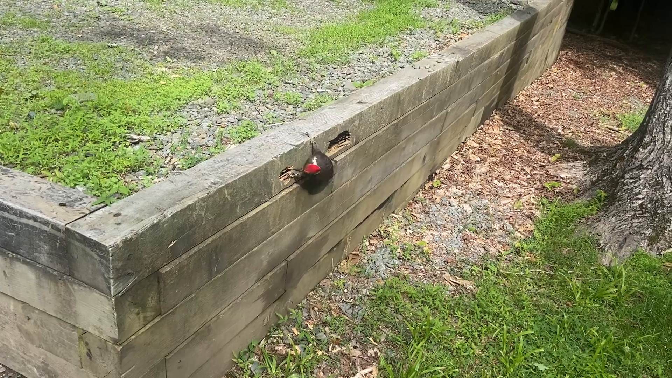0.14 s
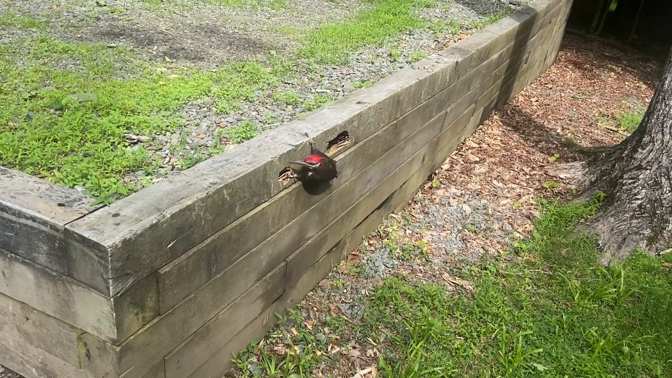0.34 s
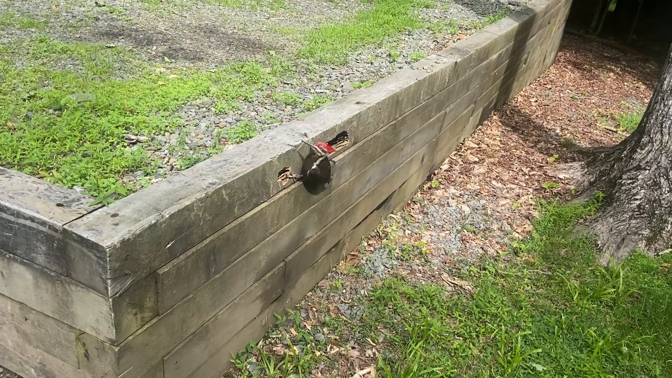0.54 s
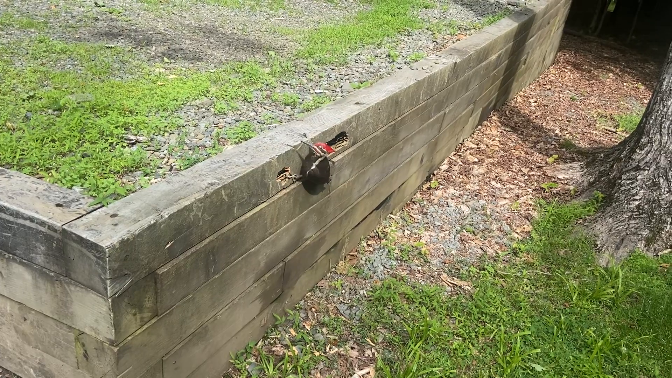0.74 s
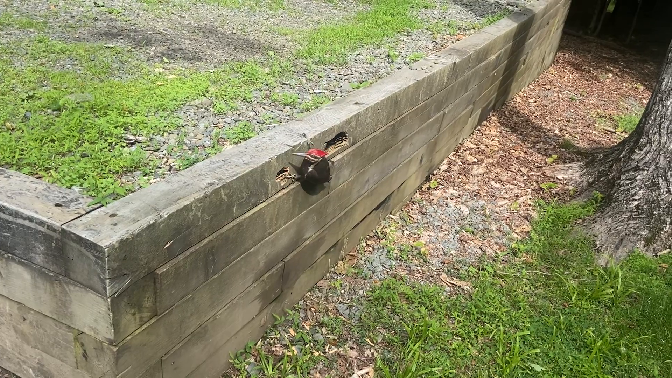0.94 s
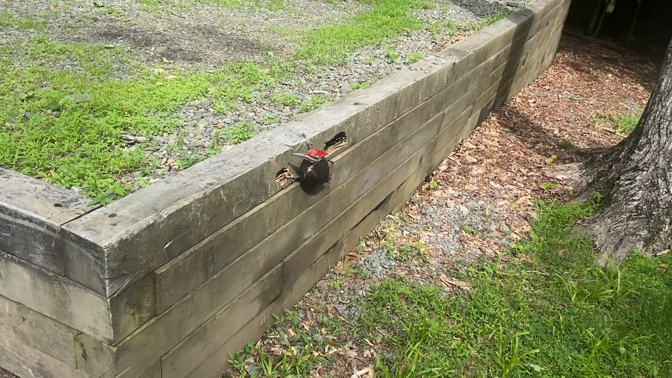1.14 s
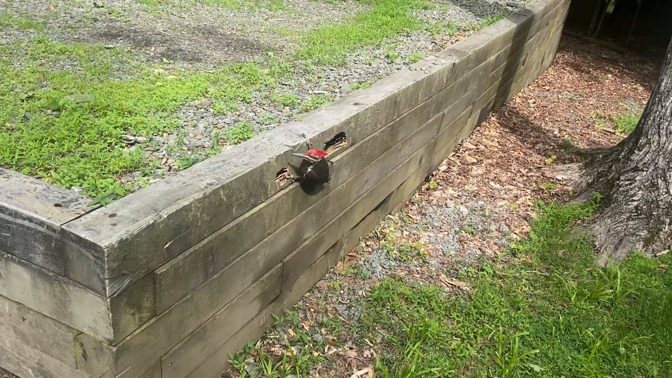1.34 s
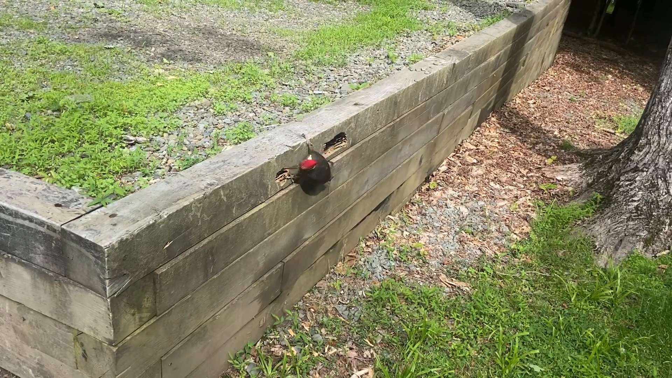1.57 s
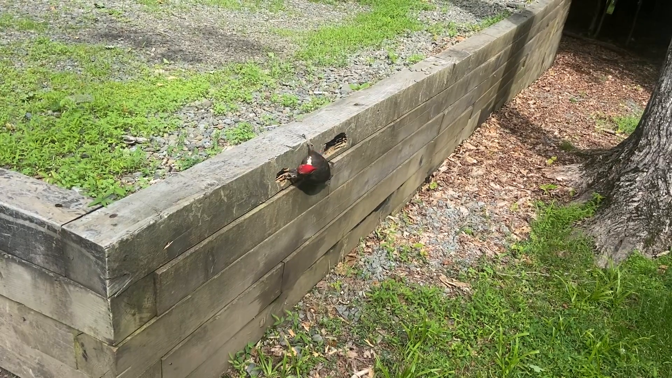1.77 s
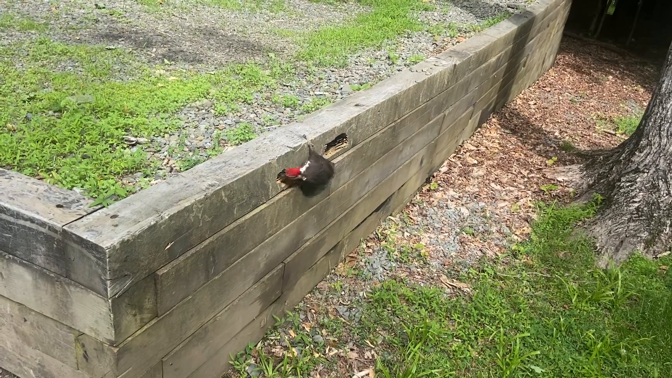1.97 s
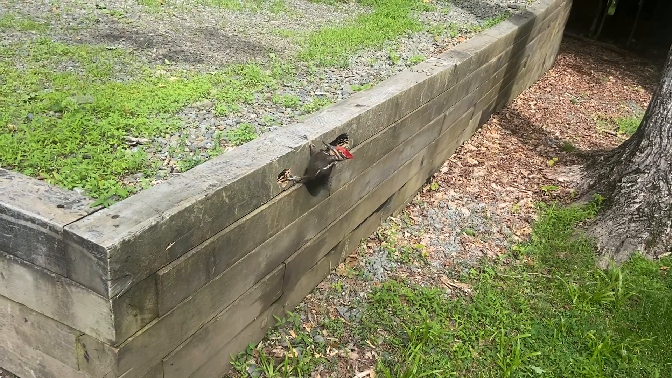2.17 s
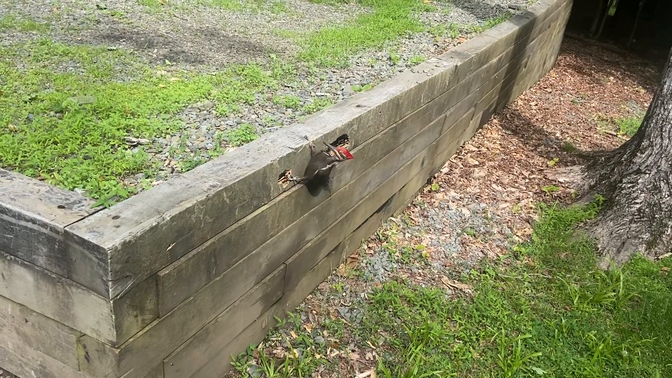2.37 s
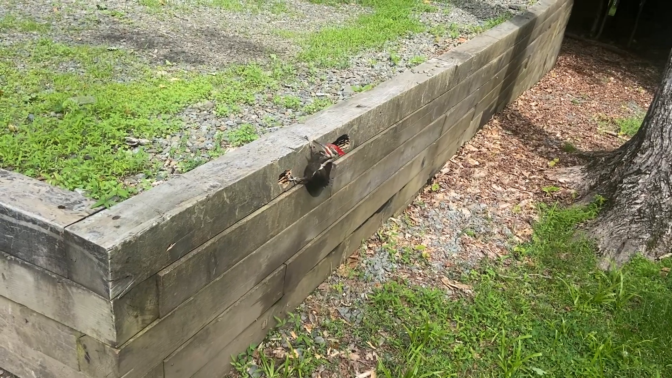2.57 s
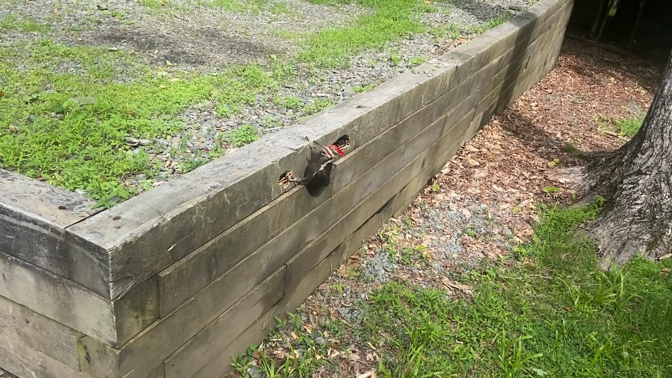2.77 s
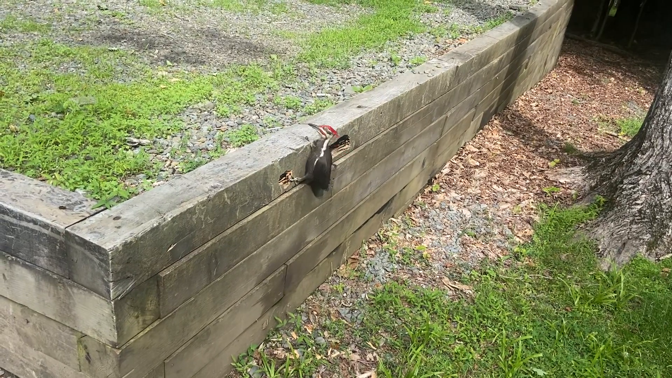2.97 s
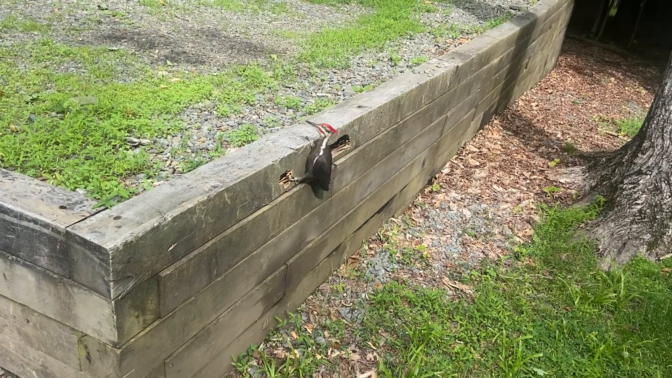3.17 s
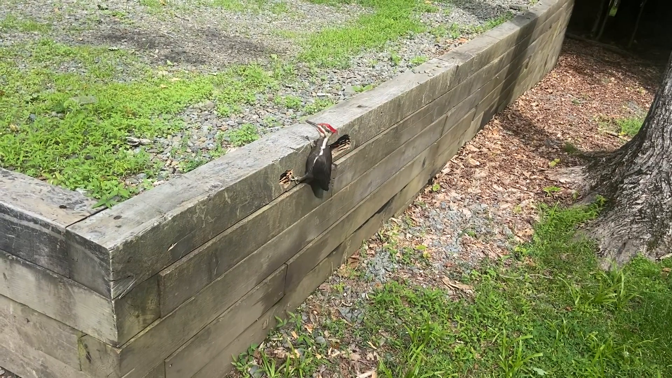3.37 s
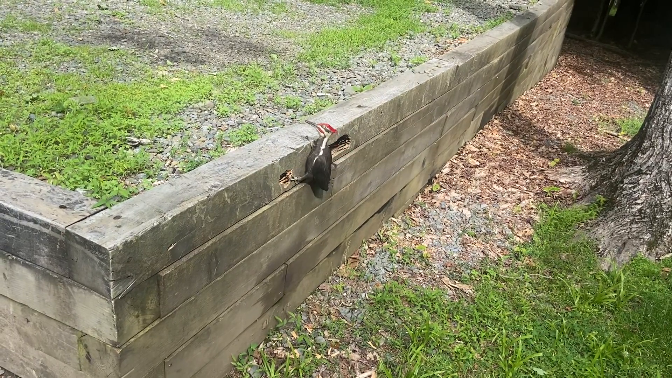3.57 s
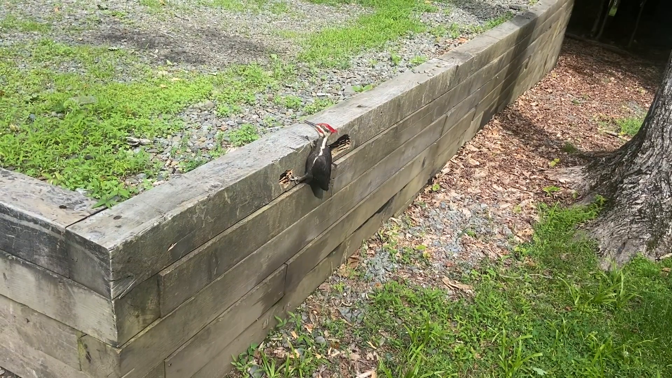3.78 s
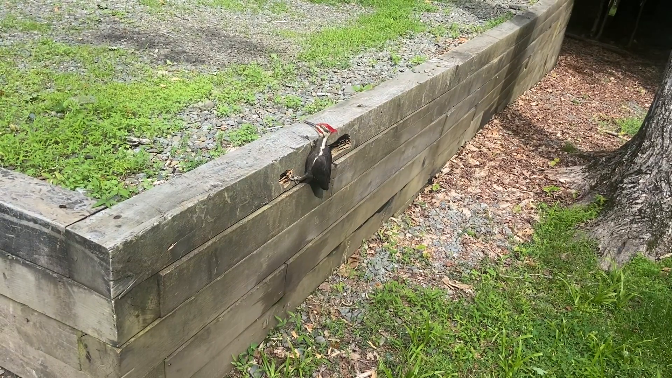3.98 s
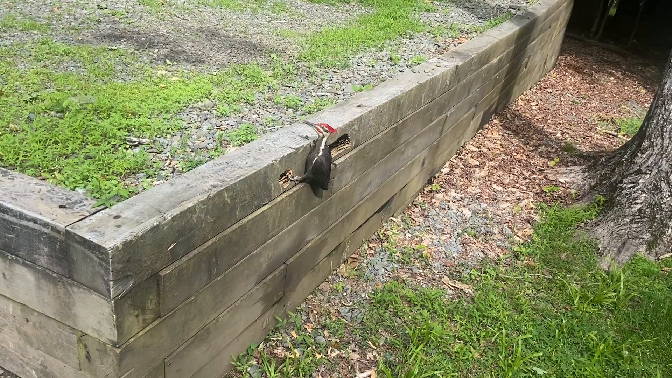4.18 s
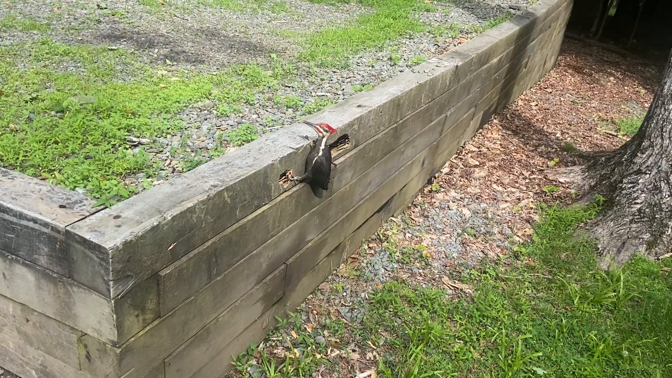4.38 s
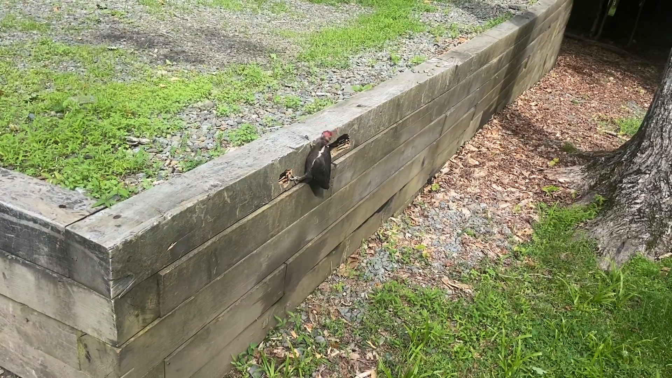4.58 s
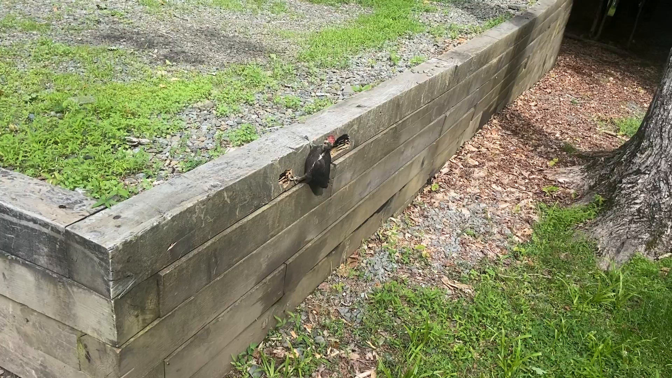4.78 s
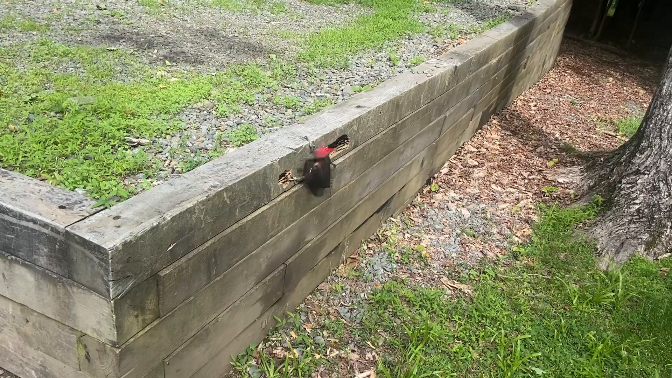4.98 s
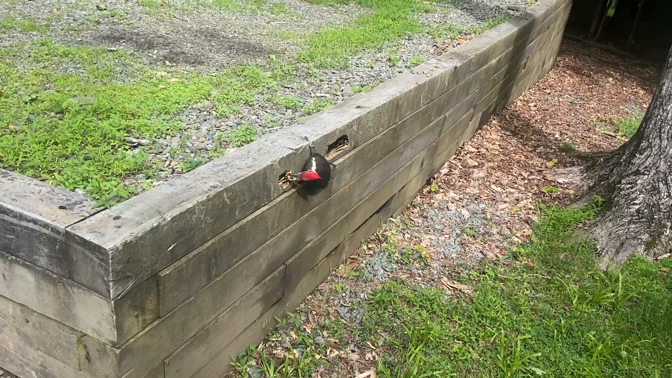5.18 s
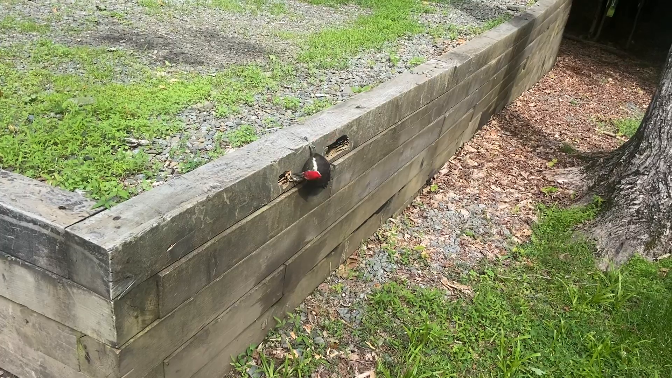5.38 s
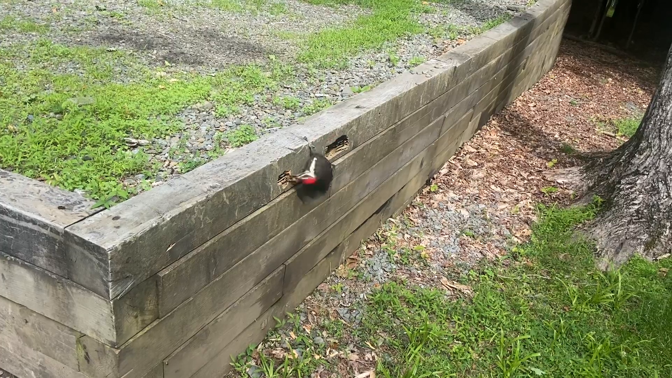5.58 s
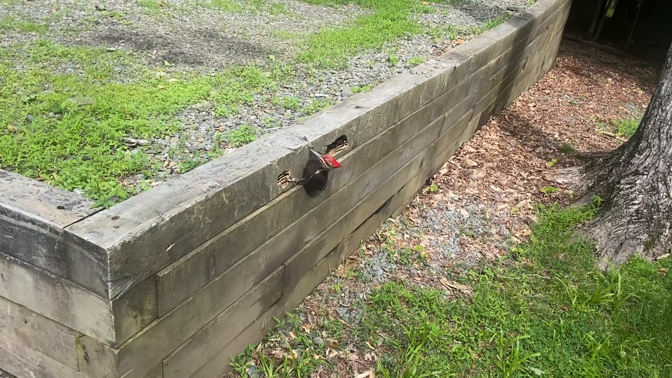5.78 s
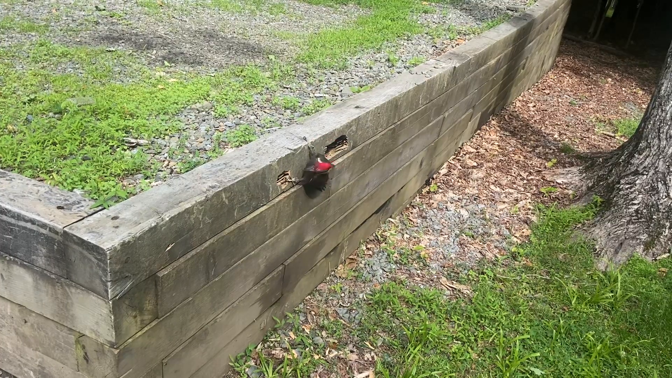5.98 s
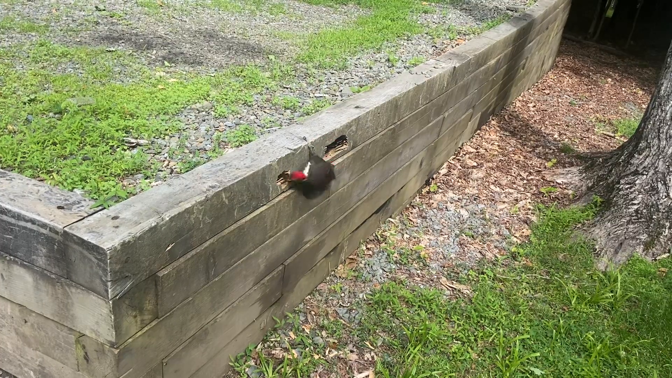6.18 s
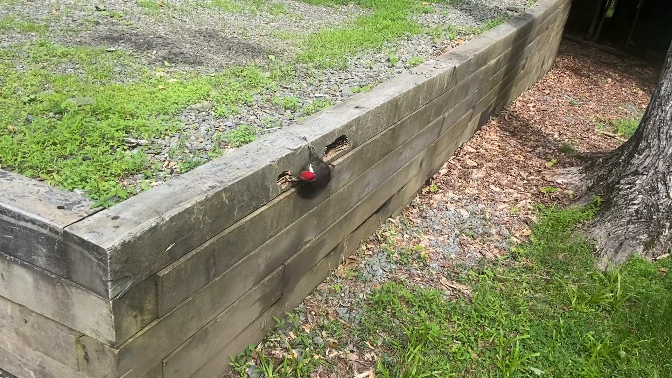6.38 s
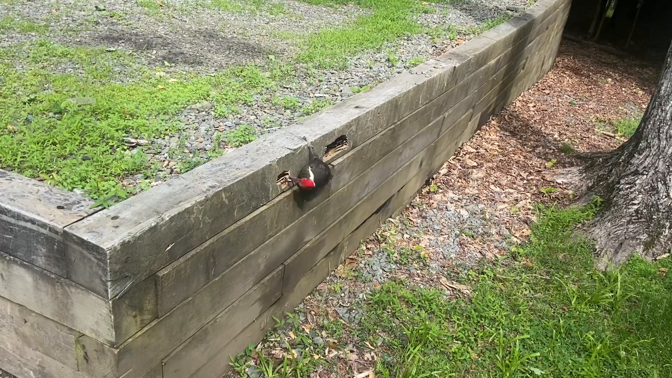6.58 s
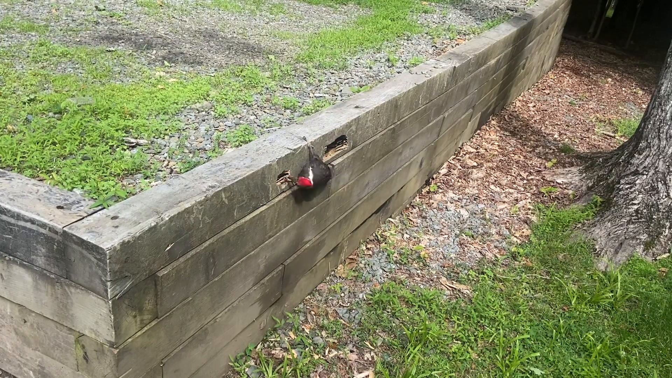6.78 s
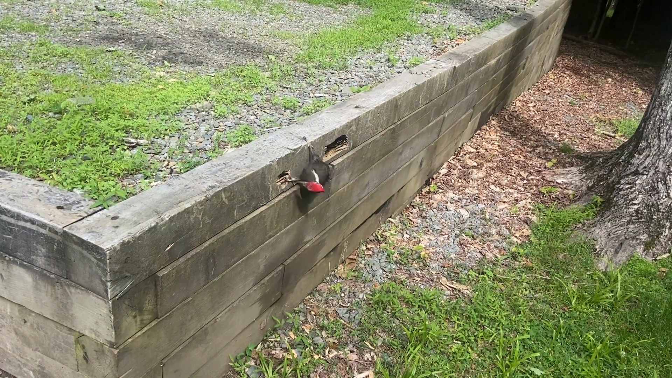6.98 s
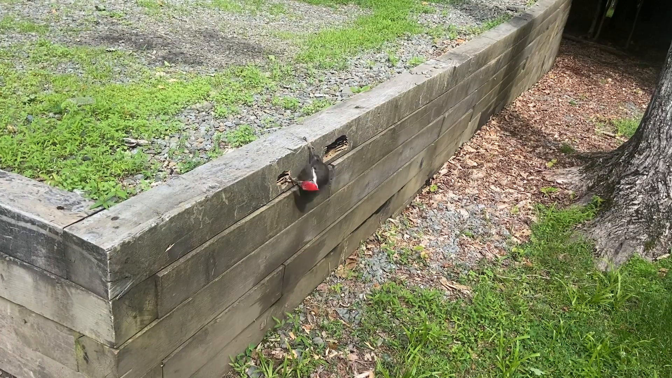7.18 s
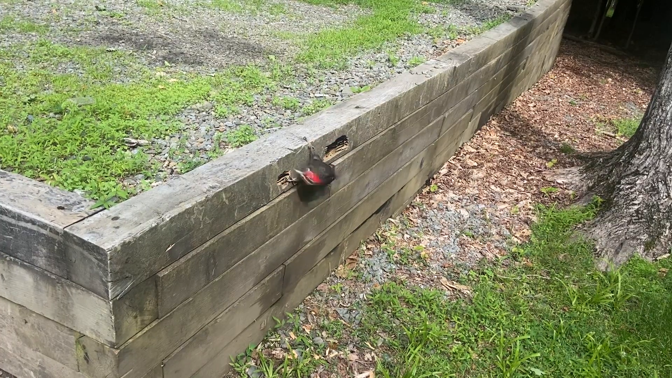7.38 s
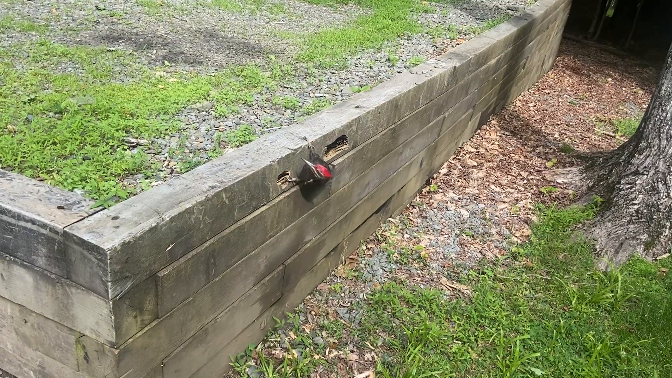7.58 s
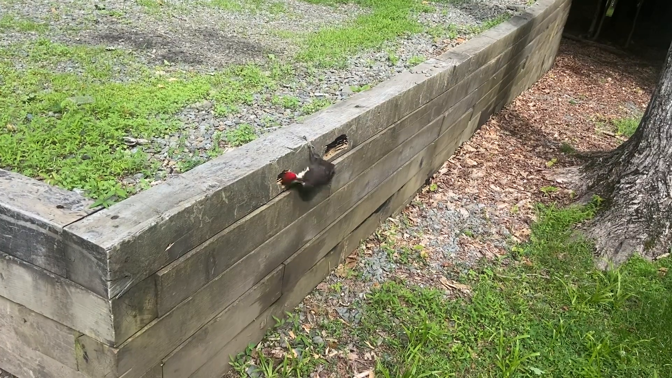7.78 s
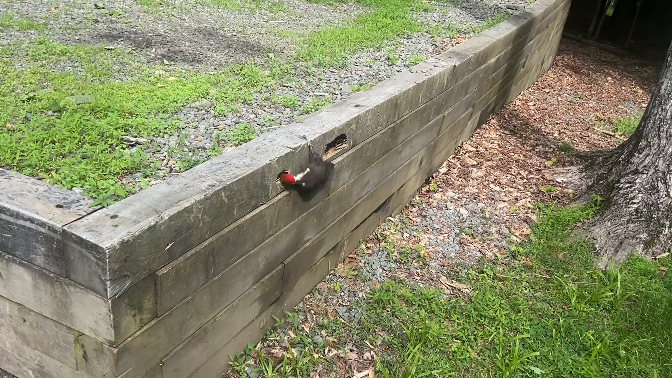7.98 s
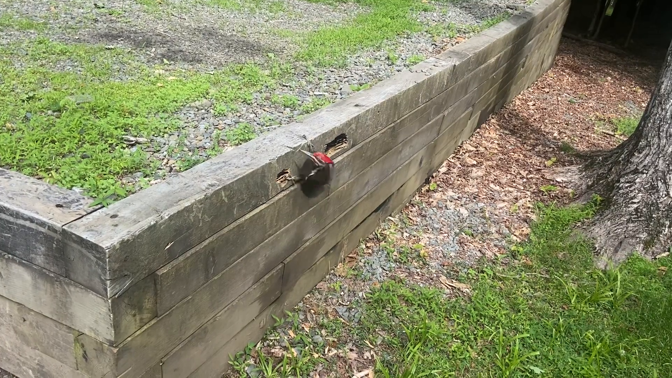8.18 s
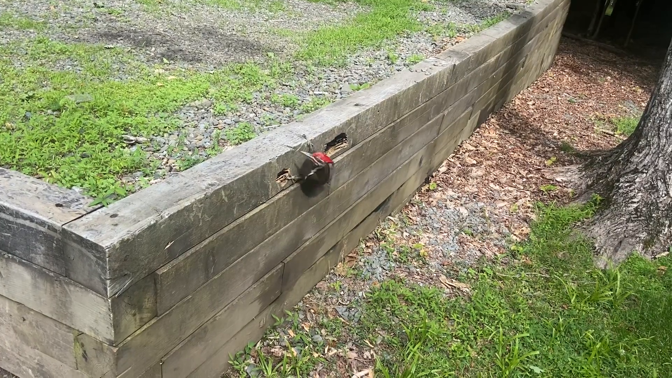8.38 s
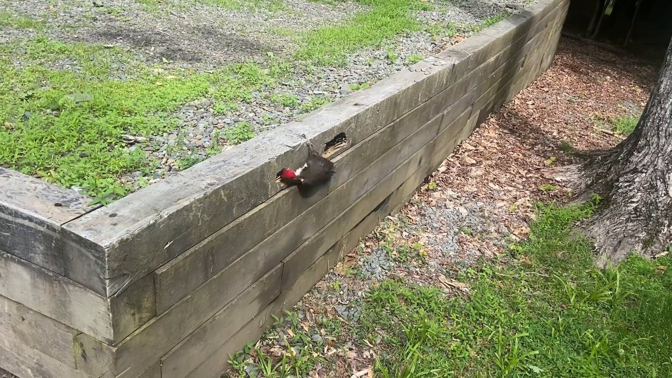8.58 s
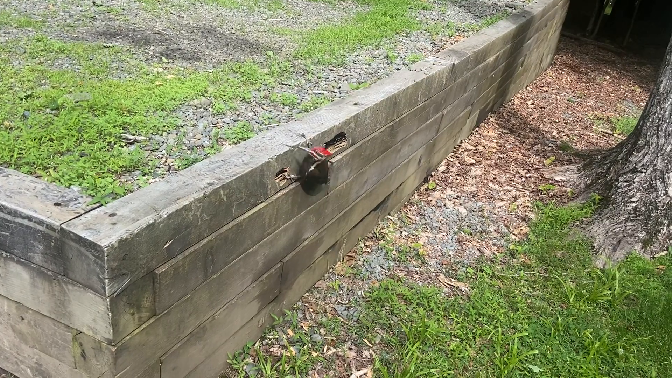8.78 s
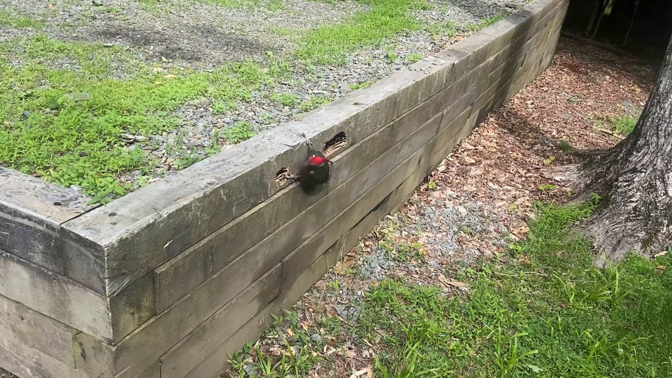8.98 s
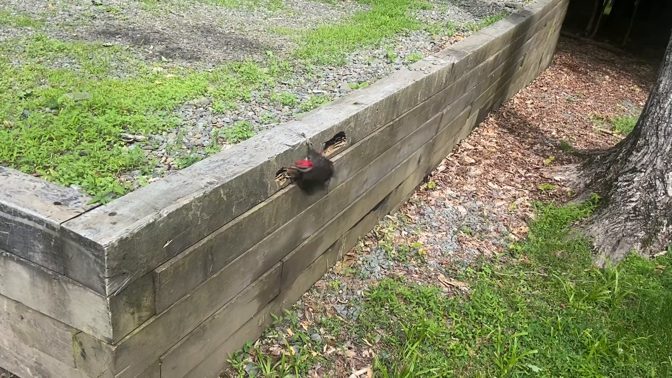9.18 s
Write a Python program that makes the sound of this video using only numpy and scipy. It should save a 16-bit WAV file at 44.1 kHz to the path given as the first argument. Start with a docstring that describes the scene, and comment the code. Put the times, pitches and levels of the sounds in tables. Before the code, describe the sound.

Outdoors by a wood, small birds sing quick, high, gliding chirps every couple of seconds over a low, faint rumble of traffic. A few metres from the microphone, a woodpecker gives a couple of sharp knocks on timber, then a quick cluster. After a gap of several seconds it returns to steadier but uneven pecking, with crisp cracks of splintering wood.

```python
"""A woodpecker chisels a stacked timber wall a few metres away, at the edge of a wood.
Each blow is an impact: fibres fracture for some milliseconds, exciting the damped modes of the beams
and radiating splinter noise. Far-off songbirds whistle gliding tones that the trees scatter into
reverberation. Beneath lie the rumble of distant traffic and a faint hiss, heard in stereo."""
import sys
import numpy as np
from scipy import signal
from scipy.fft import rfft, irfft, next_fast_len
from scipy.io import wavfile
from scipy.ndimage import map_coordinates

SR = 44100
rng = np.random.default_rng(int(sys.argv[2]) if len(sys.argv) > 2 else 0)


def generate_wav(signal):
    """Clip the signal to [-1, 1] and save it as 16-bit WAV at the path in sys.argv[1]."""
    frames = np.transpose(np.atleast_2d(signal))
    scaled = np.clip(frames, -1, 1) * 32767
    pcm = np.round(scaled).astype(np.int16)
    wavfile.write(sys.argv[1], SR, pcm)


N = 407484

# blows of the bill: t/s, strength/dB, heft/dB (thud), breadth/dB (knock and click), edge/dB (splinter),
# tip/dB (tick), entry/ms (soft push before the bite), crunch length/ms
BILL_BLOWS = [(0.2471, -7.5, -6.5, -2, -3, -18.5, 4, 0.84), (0.331, -44.5, 17.5, 0.5, 6.5, -10, 0.72, 3),
              (1.987, -31, 5.5, 3.5, -8, -13, 1.1, 11), (2.0214, -20, -14, 8, 4.5, -18, 3.7, 1.4),
              (2.038, -19.5, 1, -1, -3, -21.5, 0.9, 22), (2.062, -8.5, -6.5, -4.5, 0.5, 4.5, 5.5, 7),
              (5.516, -23, 2.5, 5, -9.5, -26, 0.91, 2.6), (5.542, -30.5, 1.5, -1, -0.5, -15, 1.5, 5.6),
              (5.583, -14, -2, -5.5, 3, 1, 6, 2.8), (6.117, -18.5, -2, 1.5, -6, -33, 1.2, 4.5),
              (6.183, -39, -9, 3, -4, -34, 0.65, 2.4), (6.415, -15, -12, 5, -7.5, -31, 2.1, 2.1),
              (6.426, -18.5, -8.5, 6, -7, -27, 0.6, 2.2), (6.629, -9, -8, 4, 0.5, -8, 5.6, 3.7),
              (6.855, -18, 5.5, 1.5, 3, -27.5, 6.9, 4.2), (7.044, -13.5, 0.5, 1, 3, -37, 2.06, 5.7),
              (7.071, -24.5, -8, -8.5, -14, -25.5, 0.79, 3.8), (7.274, -6.5, -1, -6.5, -2, -11, 4.5, 3.9),
              (7.759, -19, 4.5, 2, -3.5, -35, 9.4, 7.5), (7.974, -16, 2.5, 3.5, 5, -17, 8.6, 4),
              (8.5625, -22, -5, 5.5, 1, -38, 3.04, 2.2), (8.599, -35, -10.5, -4, -1.5, -22, 0.6, 3.6),
              (8.645, -46.5, 19, 3.5, 6, -22, 0.61, 4.3), (9.111, -13, -5.5, -4, -7, -36, 5, 0.97),
              (9.137, -40, 16, -8, 6.5, -18, 0.56, 3), (9.181, -48, 11.5, 5.5, 9, -8, 0.86, 1.9)]
# timber modes in four families (thud, knock, clack, click): f/Hz, level/dB, T60/s, left minus right/dB
TIMBER_MODES = [
    [(357.5, -4, 0.033, -1), (435.4, -4, 0.026, -0.5), (157, -7.5, 0.044, 0)],
    [(931, 2.5, 0.023, 0), (1278, -4, 0.046, -3.5), (1367, -1.5, 0.048, 5.5), (1711, 3, 0.043, -2.5)],
    [(2706, -1, 0.026, 6), (3092, 1, 0.021, 11), (3369, 2, 0.035, 1)],
    [(4388, 2.5, 0.022, 4), (5130, -4, 0.013, 8.5), (5930, -7, 0.029, -6)],
]
# excitation of each family: gain/dB, weight of heft, weight of breadth, weight of edge
FAMILY_DRIVE = [(2, 0.94, 0.24, 0.3), (-2, 0.45, 0.93, 0.02), (0, -0.23, 0.066, 0.31),
                (-5, -0.11, 0.86, 0.79)]
# splinter noise: f/Hz, relative spectral level/dB
SPLINTER_SPECTRUM = [(500, -24.5), (1500, -7), (4500, -0.5), (6000, 2.5), (7300, 3), (9000, -0.5),
                     (11000, -3), (15000, -16)]
# singers: distance/dB (less direct sound, more echo), notes;
# each note: start t/s, end t/s, start f/Hz, middle f/Hz, end f/Hz, level/dB
SONGS = [ (3.2, [(0.818, 0.836, 3700, 3263, 3130, -71), (0.837, 0.86, 3900, 4190, 3930, -62.5),
         (0.853, .936, 3650, 2776, 4640, -58), (0.972, 0.999, 3600, 3102, 2520, -58.5),
         (1.03, 1.053, 2150, 2730, 3850, -59.5), (1.056, 1.087, 3770, 3906, 4130, -55),
         (1.08, 1.12, 3500, 3080, 3520, -53), (2.447, 2.475, 3750, 2976, 2420, -59.5),
         (2.476, 2.533, 2450, 2166, 2270, -57.5), (2.541, 2.57, 2620, 3010, 3010, -52),
         (2.566, 2.58, 3050, 3666, 4400, -61), (2.58, 2.626, 4300, 3143, 2660, -54.5),
         (4.734, 4.768, 4400, 3810, 2690, -65), (4.772, 4.805, 3400, 4300, 4370, -64.5),
         (4.817, 4.85, 3800, 3166, 2530, -55.5), (4.85, 4.879, 2650, 2905, 3270, -51.5),
         (4.878, 4.915, 3250, 2480, 2270, -59), (4.914, 4.971, 2600, 3567, 3890, -54),
         (6.467, 6.494, 3900, 4270, 4120, -63.5), (6.505, 6.56, 4370, 3590, 3430, -59),
         (6.691, 6.722, 3620, 2920, 2200, -55.5), (6.735, 6.763, 2524, 3020, 3900, -55.5),
         (6.765, 6.825, 3350, 2950, 2600, -59.5)]), (8, [(0.074, 0.205, 2980, 4220, 4160, -82.5),
         (1.13, 1.3, 4500, 5180, 4580, -87), (3.882, 4.13, 5540, 5540, 6650, -91.5),
         (4.18, 4.275, 3750, 2655, 2960, -75), (4.278, 4.42, 2900, 2257, 3300, -74),
         (4.723, 4.755, 4800, 5210, 4900, -81.5), (5.72, 5.88, 4200, 4500, 5040, -80),
         (6.668, 6.72, 4800, 5350, 5700, -75.5), (7.42, 7.555, 4000, 2710, 2155, -76),
         (8.92, 8.964, 2920, 3770, 3920, -76), (9.055, 9.095, 2650, 2770, 3300, -68.5)]),
         (6, [(2.25, 2.295, 4300, 4930, 5040, -75), (2.292, 2.36, 5150, 5190, 5190, -69),
         (2.35, 2.435, 4070, 4827, 5110, -70), (3.315, 3.355, 6670, 7200, 7800, -85.5)])]
# traffic, leaves and microphone hiss: f/Hz, relative spectral level/dB, channel coherence (0-1)
BACKGROUND_SPECTRUM = [(20, -30, .95), (38.6, -15, 0.88), (54.6, 2, 0.98), (83.3, -3.5, 1),
                       (112.5, -6, 0.94), (192, -16, 0.83), (470, -23.5, 0.6), (1070, -32, 0),
                       (1750, -39.5, 0.11), (2692, -40, 0.93), (5150, -54, 0.09), (6870, -58, 1),
                       (11600, -61.5, .95), (13730, -81, 0.25)]
# swells, each taken about its mean: t/s, deep rumble/dB, upper rumble/dB, tyre and leaf hiss/dB
TRAFFIC_SWELLS = [(0.0, -60.5, -61, -79), (3.55, -60, -61.5, -79.5), (4.55, -55, -62.5, -79.5),
                  (6.28, -61.5, -60, -75.5), (8.98, -59.5, -61.5, -79.5), (9.24, -58.5, -60.5, -77)]
# microphone ports: f/Hz, phase lead of left over right/cycles
PORT_PHASE = [(100, -.02), (700, .08), (2500, .11), (4500, .03), (7200, .0), (9050, -.5), (11100, -1.0),
              (13050, -1.5), (15400, -2.03)]


def woodpecker(lead_s=.02, grain_db=3.0):
    """Impact excitation: each blow rings the timber, sheds splinters and echoes off the surroundings."""
    direct, to_echo = np.zeros((2, N)), np.zeros(N)
    t = np.arange(4096) / SR
    since_bite, rattle = t - lead_s, flutter(320)
    for s, blow_db, heft_db, breadth_db, edge_db, tip_db, entry_ms, crunch_ms in BILL_BLOWS:
        start_s = s - lead_s
        since_crunch = np.maximum(since_bite - crunch_ms / 1000, 0)
        snaps = rng.standard_normal(len(t)) * undb(grain_db * rng.exponential(size=len(t)))
        # the bill pushes softly through rotten fibres before it bites sound wood
        entry = undb(-11.5) * np.exp(np.minimum(since_bite + entry_ms / 1000, 0) / 0.00016)
        crunch = snaps * np.where(since_bite < 0, entry, np.exp(-since_crunch / 0.0022))
        crunch[int(lead_s * SR)] = undb(19)  # the hard first snap of the bite
        for modes, (family_db, by_heft, by_breadth, by_edge) in zip(TIMBER_MODES, FAMILY_DRIVE):
            drive_db = blow_db + family_db + by_heft * heft_db + by_breadth * breadth_db
            drive_db += by_edge * edge_db
            for hz, db, t60, pan_db in modes:
                ring = timber_mode(crunch, t, hz, t60, rattle)
                ring *= undb(drive_db + db + 2.5 * rng.standard_normal())
                add(direct, start_s, undb(opposed(pan_db / 2)) * ring)
                # the crack radiates all round and feeds the echoes; the after-ring hardly does
                add(to_echo, start_s, ring[0] * np.exp(-since_crunch / 0.0083))
        chips = undb(blow_db + edge_db) * splinters(crunch, since_bite)
        tick = undb(blow_db + tip_db) * bill_tick(snaps, since_bite)
        add(direct, start_s, chips + tick)
        add(to_echo, start_s, 1.09 * chips)
    return direct + undb(-7.5) * ground_scatter(to_echo)


def timber_mode(force, t, hz, t60, rattle):
    """Forced vibration: a mode's response is the force convolved with a damped sinusoid."""
    # each mode radiates from its own stretch of wall, so it reaches the ports out of phase
    skew = opposed(min(hz / 12000, .3) * rng.standard_normal())
    detuned_hz = hz * (1 + .022 * rng.standard_normal())
    envelope = 1000 ** (-t / t60) * (1 - np.exp(-t * hz / 2))
    impulse_response = np.sin(2 * np.pi * detuned_hz * t + skew) * envelope
    ring = signal.fftconvolve(force[None], impulse_response, axes=1)[:, :len(t)]
    # cracked, loosely stacked wood rattles as it rings
    return unit_energy(ring * (1 + .45 * rattle[rng.integers(N - len(t)):][:len(t)]))


def splinters(crunch, since_bite):
    """Fracture radiates broadband noise; loose chips crackle briefly after the crunch."""
    crackle = .25 * rng.standard_normal(len(crunch)) * undb(4.5 * rng.exponential(size=len(crunch)))
    chips = crunch + crackle * 1000 ** (-since_bite / .05) * (since_bite > 0)
    return unit_energy(colour(chips, lambda hz: undb(along(SPLINTER_SPECTRUM, hz))))


def bill_tick(snaps, since_bite):
    """Brief contact gives high frequencies: the hard tip ticks as it bites."""
    contact = snaps * (since_bite > 0) * np.exp(-np.abs(since_bite) / 0.00033)
    return unit_energy(colour(contact, lambda hz: 1 - lowpass(hz, 5800)))


def ground_scatter(sound):
    """Scattering off grass and leaves blurs the pitches of a blow."""
    tail = echoes(sound, t60=(.09, .7), late_db=-21.5, onset_s=0.00066, coherence=0.92)
    blurred = doppler_blur(tail, delay_s=30e-6, rate_hz=400)
    return colour(blurred, lambda hz: hz / (hz + 200) / (1 + (hz / 8900) ** 2))


def songbirds(throat_hz=2400, trill_hz_per_db=18, directivity=0.32):
    """Frequency modulation: near-pure whistles glide along parabolas and reverberate in the wood."""
    direct, to_echo, trill = np.zeros(N), np.zeros(N), flutter(90)
    for distance_db, song in SONGS:
        for s, end_s, start_hz, middle_hz, end_hz, db in song:
            u = np.linspace(0, 1, int((end_s - s) * SR))
            hz = start_hz * (1 - u) * (1 - 2 * u) + middle_hz * 4 * u * (1 - u) + end_hz * u * (2 * u - 1)
            # far singers warble more, and the throat passes low pitches poorly
            hz += trill_hz_per_db * distance_db * trill[int(s * SR):][:len(u)]
            envelope = undb(db) * np.sin(np.pi * u) ** 0.18 / np.sqrt(1 + (throat_hz / hz) ** 8)
            note = np.sqrt(2) * envelope * np.sin(2 * np.pi * np.cumsum(hz) / SR)
            add(direct, s, note * undb(-distance_db))
            # quick glides feed the echo more than held pitches
            glide = np.abs(np.gradient(hz)) * SR / 77000 + 0.042
            # loud notes are partly loud because the bill points this way; the wood receives less
            echo_db = distance_db - directivity * max(db + 55.5, 0)
            add(to_echo, s, note * undb(echo_db) * np.sqrt(glide) * hz / 3000)
    trees = echoes(to_echo, t60=(.5, 1.6), late_db=0.5, onset_s=0.009, coherence=0.59)
    near_branches = undb(-3) * echoes(direct, t60=(.06, .06), late_db=0, onset_s=.002, coherence=.9)
    return direct + near_branches + doppler_blur(trees, delay_s=45e-6, rate_hz=70)


def echoes(x, t60, late_db, onset_s, coherence):
    """Diffuse scattering from trunks and ground: a noise tail with early and late decay times, T60/s."""
    t = np.arange(int(1.6 * SR)) / SR
    shared, own = rng.standard_normal(len(t)), rng.standard_normal((2, len(t)))
    fade = (1 - np.exp(-t / onset_s)) * (1000 ** (-t / t60[0]) + undb(late_db) * 1000 ** (-t / t60[1]))
    tail = (np.sqrt(coherence) * shared + np.sqrt(1 - coherence) * own) * fade
    return signal.fftconvolve(x[None], np.sqrt(2) * unit_energy(tail), axes=1)[:, :N]


def doppler_blur(stereo, delay_s, rate_hz):
    """Doppler broadening: moving leaves vary the delay of the sound that they scatter."""
    positions = np.arange(N) + delay_s * SR * flutter(rate_hz)
    return np.array([map_coordinates(port, [positions], mode="mirror") for port in stereo])


def traffic_and_leaves(level_db=-52.5):
    """Many random sources sum to partly coherent noise; its bands swell as traffic comes and goes."""
    def noise(sign):
        return colour(rng.standard_normal(N), lambda hz: undb(along(BACKGROUND_SPECTRUM, hz))
                      * np.sqrt(1 + sign * along(BACKGROUND_SPECTRUM, hz, column=2)))
    mid, side = noise(1), noise(-1)
    bed = mid + opposed(side)
    bed *= undb(level_db) / np.std(bed)
    s, *swells = np.transpose(TRAFFIC_SWELLS)
    deep_db, upper_db, hiss_db = (np.interp(np.arange(N) / SR, s, db - db.mean()) for db in swells)
    deep = colour(bed, lambda hz: lowpass(hz, 85))
    low = colour(bed, lambda hz: lowpass(hz, 300))
    top = colour(bed, lambda hz: 1 - lowpass(hz, 4000))
    return deep * undb(deep_db) + (low - deep) * undb(upper_db) + (bed - low - top) * undb(hiss_db) + top


def flutter(rate_hz):
    """Low-pass noise of unit variance."""
    wobble = colour(rng.standard_normal(N), lambda hz: np.exp(-(hz / rate_hz) ** 2))
    return wobble / np.std(wobble)


def undb(db):
    return 10 ** (np.asarray(db) / 20)


def unit_energy(x):
    return x / np.sqrt(np.sum(x ** 2))


def lowpass(hz, corner_hz):
    return 1 / (1 + (hz / corner_hz) ** 4)


def opposed(x):
    """Left +x, right -x."""
    return x * np.array([[1], [-1]])


def along(table, hz, column=1):
    """Interpolation of a table column in log frequency."""
    rows = np.array(table)
    return np.interp(np.log(hz + 1), np.log(rows[:, 0]), rows[:, column])


def colour(x, gain):
    """Linear filtering: the spectrum is multiplied by gain(f/Hz)."""
    size = next_fast_len(x.shape[-1])
    return irfft(rfft(x, size) * gain(np.fft.rfftfreq(size, 1 / SR)), size)[..., :x.shape[-1]]


def add(out, s, sound):
    """Superpose a sound at s seconds."""
    at = int(s * SR)
    out[..., at:at + sound.shape[-1]] += sound[..., :N - at]


def scene():
    """Superposition: the pressures of woodpecker, singers and background add."""
    return woodpecker() + songbirds() + traffic_and_leaves()


def record(dry):
    """The two ports differ in phase with frequency; a low-pass filter limits the band to 16.7 kHz."""
    ports = colour(dry, lambda hz: np.exp(1j * np.pi * opposed(along(PORT_PHASE, hz))))
    return signal.sosfilt(signal.ellip(10, .2, 70, 16700, fs=SR, output="sos"), ports)


dry = scene()
out = record(dry)
generate_wav(out)
```